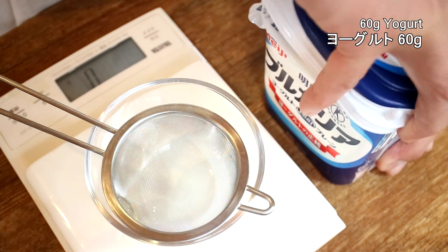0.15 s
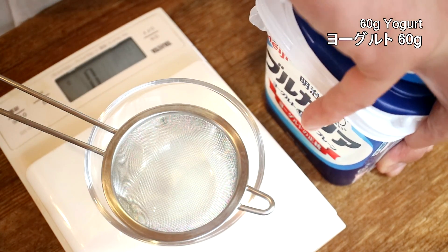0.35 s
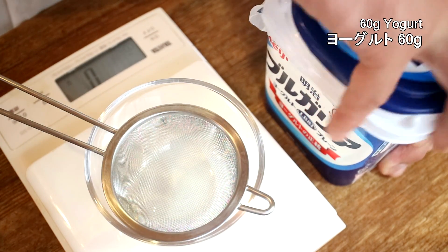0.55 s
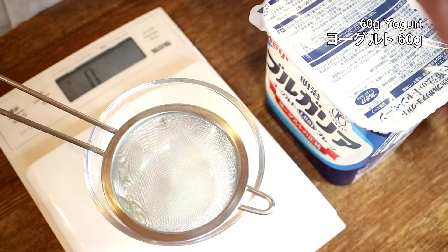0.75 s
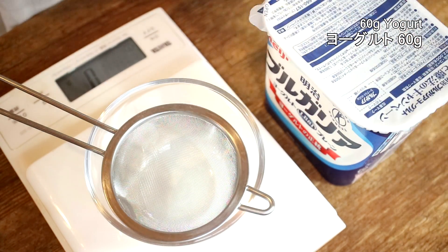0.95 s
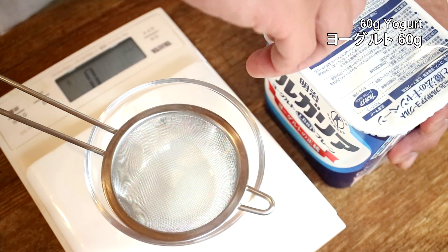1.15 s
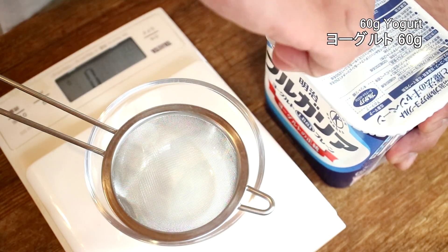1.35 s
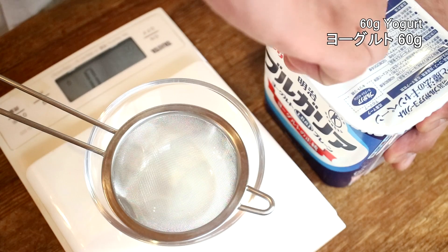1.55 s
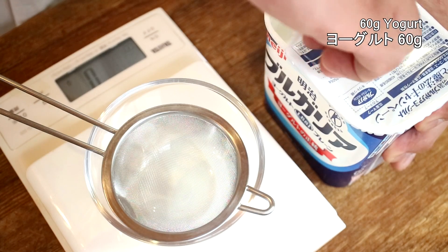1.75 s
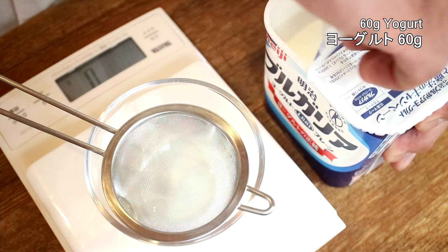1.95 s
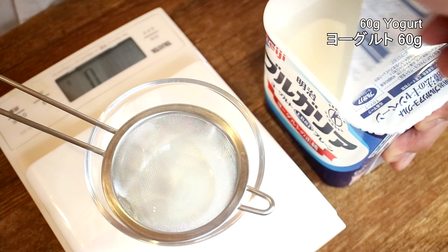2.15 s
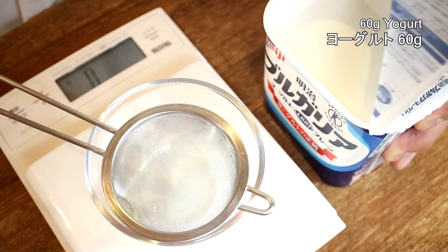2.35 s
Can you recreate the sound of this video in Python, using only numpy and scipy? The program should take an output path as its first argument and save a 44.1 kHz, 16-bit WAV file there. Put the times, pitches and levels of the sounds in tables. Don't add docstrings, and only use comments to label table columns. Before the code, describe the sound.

A plastic tub lid snaps off loudly, bounces faintly, then fingers tap and rub the tub before its foil seal is peeled with crackles, ticks and small squeaks; close stereo microphone in a small kitchen.

```python
import sys
import numpy as np
from scipy import signal
from scipy.fft import rfft, irfft, next_fast_len
from scipy.io import wavfile
from scipy.ndimage import uniform_filter1d

SR = 44100
rng = np.random.default_rng(int(sys.argv[2]) if len(sys.argv) > 2 else 0)


def voltage_ratio(decibels):
    exponent = np.asarray(decibels, float) / 20
    return 10 ** exponent


def to_wav(sig):
    pcm = np.clip(np.atleast_2d(sig), -1, 1) * 32767
    pcm = np.round(pcm).astype(np.int16)
    wavfile.write(sys.argv[1], SR, pcm.T)


N = 110250
T = np.arange(N) / SR
M = next_fast_len(N + SR)
HZ = np.maximum(np.arange(M // 2 + 1) * SR / M, 1.)

RING_CYCLES = 50
SLIPS_PER_S, SLIP_SCATTER_DB, SLIP_TOP_DB = 1500, 3.5, 9
CRACKLES_PER_S, CRACKLE_SCATTER_DB = 600, 3.8


def curve(table):
    table = np.array(table)
    return np.interp(np.log(HZ), np.log(table[:, 0]), table[:, 1])


def shape(x, gain):
    return irfft(rfft(x, M) * gain, M)[..., :N]


def rms(x):
    return np.sqrt(np.mean(x ** 2))


def level(x, db):
    return x * voltage_ratio(db) / rms(x)


def add(out, start_s, x):
    i = int(start_s * SR)
    out[i:i + len(x)] += x[:len(out) - i]


def swell(start_s, length_s, attack_s, release_s):
    rise = np.clip((T - start_s) / attack_s, 0, 1)
    return rise * np.exp(-np.maximum(T - start_s - length_s, 0) / release_s)


def wander(seconds):
    k = int(seconds * SR)
    smooth = uniform_filter1d(rng.standard_normal(N), k)
    return level(uniform_filter1d(smooth, k), 0)


def slips(rate, scatter_db, size=N):
    when, sign, strength = rng.random((size, 3)).T
    strength_db = np.minimum(-scatter_db * np.log(strength + 1e-9), SLIP_TOP_DB)
    return (when < rate / SR) * np.sign(sign - .5) * voltage_ratio(strength_db)


def ring(force, modes, extra_db=0):
    mode_hz = np.array(modes)[:, 0]
    new_cluster = mode_hz[1:] > 1.15 * mode_hz[:-1]
    sense = (-1.) ** np.cumsum(np.r_[0, new_cluster])
    extra_db = extra_db + np.zeros(len(modes))
    out = 0
    for (hz, db, t60), more_db, sign in zip(modes, extra_db, sense):
        t60 = np.clip(t60, .004, RING_CYCLES / hz)
        r = np.exp(-np.log(1000) / (t60 * SR))
        w = 2 * np.pi * hz / SR
        resonance = signal.lfilter([.5, 0, -.5], [1, -2 * r * np.cos(w), r * r], force) / np.sin(w)
        out = out + sign * voltage_ratio(db + more_db) * resonance
    return out


def blow(modes, peak_db, contact_ms, extra_db, scuff_db, scuff_s):
    t = T[:SR // 4]
    push = np.exp(-.5 * ((t[:88] - .001) * 4000 / contact_ms) ** 2)
    scuff = slips(SLIPS_PER_S, SLIP_SCATTER_DB, size=len(t)) * np.exp(-t / scuff_s)
    force = (t == 0) + voltage_ratio(scuff_db) * scuff
    y = ring(np.convolve(force, push)[:len(t)], modes, extra_db)
    return y * voltage_ratio(peak_db) / np.abs(y).max()


# pitch_hz [Hz], level_db [dB], t60_s [s]
LID_MODES = [(85, -42, .1), (158, -37, .13), (445, -9, .075), (523, -14, .06), (600, -10, .04),
             (671, -9, .08), (820, -1, .065), (886, -2, .06), (996, -1, .045), (1290, -13, .05),
             (1627, 3, .05), (1846, 1, .055), (2340, -9, .03), (3800, -9, .013)]
# start_s [s], peak_db [dB]
LID_POPS = [
    (0.2133, -4),
    (.2275, -14),
    (.2545, -37),
    (.271, -36.5),
    (.295, -40.5),
    (.308, -36.5),
]
# pitch_hz [Hz], level_db [dB per Hz]
FOIL_SPECTRUM = [(710, -28), (1200, -4), (1520, -7), (1800, -8), (2290, -12.5), (2710, -8), (3050, -9.5),
                 (7600, -20), (12000, -30), (16800, -53.5), (22000, -120)]


def lid():
    out = np.zeros(N)
    for start_s, peak_db in LID_POPS:
        add(out, start_s - .001, blow(LID_MODES, peak_db, contact_ms=.36, extra_db=0, scuff_db=-27, scuff_s=.025))
    burst = rng.standard_normal(N) * np.exp(-T / .01)
    crack = shape(burst, voltage_ratio(curve(FOIL_SPECTRUM)) * (HZ > 1200))
    add(out, LID_POPS[0][0], crack * voltage_ratio(-31) / np.abs(crack).max())
    return out


# pitch_hz [Hz], level_db [dB], t60_s [s]
TUB_MODES = [(221, -19, .05), (405, -14, .04), (458, -12, .05), (600, -12, .025), (690, -5, .025),
             (810, 0, .055), (942, -8, .04), (998, 0, .045), (1230, -11, .03), (1620, -14, .016),
             (2200, -12, .016), (2800, -7, .018), (3450, -7, .014), (4000, -10, .013)]
# start_s [s], peak_db [dB], scuff_s [s], low_modes_db [dB], high_modes_db [dB]
KNOCKS = [(.139, -50.5, 0.036, 0, 17.5), (0.19, -29, 0.006, 1, 8), (0.523, -50.5, 0.0052, -8.5, -2),
          (.575, -45.5, 0.0031, -10, 18), (0.591, -30.5, 0.01, -2.5, 19), (.606, -36.5, 0.003, 10.5, 21.5),
          (.613, -47, 0.008, 23, 3), (1.0995, -32, 0.01, 5, 3), (1.329, -33, 0.012, 1, -4),
          (1.503, -46.5, 0.0056, -16.5, -7), (1.571, -55.5, 0.0022, -32, 10),
          (1.634, -39.5, 0.0045, -22, 2), (1.734, -38, 0.0037, -17, -11), (1.823, -32.5, 0.0071, -9, -24),
          (1.862, -34, 0.024, -18, -6), (1.885, -33.5, 0.004, -17, -3), (2.222, -31, 0.0031, 5, 18),
          (2.235, -24.5, 0.0013, -23, 25)]
KNOCK_RIM_DB = [0, 3, 0, 4, 6, 3, 4, -3, -7, 4, -4, -3, 0, 7, 7, 7, 0, 3]


def knocks():
    out = np.zeros(N)
    hz = np.array(TUB_MODES)[:, 0]
    chance_db = 1.0 * rng.standard_normal((len(KNOCKS), len(TUB_MODES)))
    for knock, rim_db, scatter_db in zip(KNOCKS, KNOCK_RIM_DB, chance_db):
        start_s, peak_db, scuff_s, low_db, high_db = knock
        rim = np.abs(hz - 1000) < 100
        place_db = low_db * (hz < 600) + high_db * (hz > 1300) + rim_db * rim + scatter_db
        add(out, start_s - .001, blow(TUB_MODES, peak_db, .2, place_db, -7, scuff_s))
    return out


def crackle():
    snaps = slips(CRACKLES_PER_S, CRACKLE_SCATTER_DB)
    spectrum = 0
    for hz in 1200 * 2 ** (np.arange(11) / 3):
        grains = slips(CRACKLES_PER_S, CRACKLE_SCATTER_DB) + .35 * snaps
        patches = voltage_ratio(3.5 * wander(.025))
        band = np.exp(-(np.log2(HZ / hz) * 3) ** 2)
        spectrum = spectrum + rfft(grains * patches, M) * band
    return level(irfft(spectrum * voltage_ratio(curve(FOIL_SPECTRUM)), M)[:N], 0)


# pitch_hz [Hz], level_db [dB], t60_s [s]
TABLE_MODES = [(84.84, -1.5, 0.086), (131.53, -26, 0.07), (150.9, 8.5, 0.17), (285, -15, 0.12),
               (282.6, 14.5, 0.068)]
# start_s [s], length_s [s], tub_db [dB], foil_db [dB], table_db [dB]
STROKES = [(0, 0.094, -60, -71.5, -81), (0.171, 0.097, -48, -56, -77), (0.513, 0.02, -59, -65, -62.5),
           (0.587, 0.02, -77, -58, -61.5), (0.767, 0.024, -82, -71.5, -88), (0.93, 0.022, -78, -68, -78),
           (1.027, 0.084, -72, -67.5, -72), (1.104, 0.15, -59, -78.5, -79), (1.204, 0.061, -62, -69, -75),
           (1.315, 0.035, -48.5, -61.5, -69), (1.478, 0.18, -65.5, -60.5, -67.5),
           (1.562, 0.05, -50.5, -53.5, -56.5), (1.625, 0.0064, -43.5, -68, -50),
           (1.702, 0.17, -57.5, -62, -61.5), (1.801, 0.012, -51.5, -52.5, -82),
           (1.825, 0.049, -45.5, -48, -63), (1.87, 0.076, -47.5, -49, -52.5), (1.952, 0.11, -52, -53, -55),
           (2.073, 0.051, -48.5, -51.5, -52), (2.125, 0.096, -46, -50, -42),
           (2.214, 0.048, -46, -45, -41.5), (2.273, 0.099, -54.5, -53.5, -46),
           (2.374, 0.045, -58.5, -52, -44), (2.411, 0.085, -51.5, -53.5, -43)]


def stroke_envelope(column, attack_s):
    power = 0
    for stroke in STROKES:
        power = power + (swell(stroke[0], stroke[1], attack_s, .02) * voltage_ratio(stroke[column])) ** 2
    return np.sqrt(power)


def dragged(modes, column):
    force = slips(SLIPS_PER_S, SLIP_SCATTER_DB)
    return ring(force * stroke_envelope(column, attack_s=.01), modes) / rms(ring(force, modes))


def strokes():
    tub = dragged(TUB_MODES, column=2)
    table = dragged(TABLE_MODES, column=4)
    return tub + table + crackle() * stroke_envelope(column=3, attack_s=.025)


# start_s [s], peak_db [dB]
TICKS = [(1.488, -47), (1.5344, -50), (1.5714, -39.5), (1.5993, -45), (1.8654, -36), (1.8784, -43),
         (1.9034, -30.5), (1.9254, -36), (1.9514, -33), (1.9824, -48), (2.0014, -47.5), (2.0474, -39),
         (2.0594, -54), (2.1086, -46), (2.1395, -34.5), (2.1654, -43.5), (2.2209, -40.5), (2.2338, -31),
         (2.2424, -73), (2.3044, -42), (2.4788, -40.5)]
# start_s [s], length_s [s], pitch_hz [Hz]
STRIPS = [(1.818, .03, 4350), (1.84, .06, 3750), (1.895, .06, 3420), (1.878, .03, 5900), (1.84, .04, 6700),
          (1.985, .07, 3350), (2.03, .04, 7050), (2.285, .05, 7600), (2.345, .1, 7200), (2.26, .04, 3500),
          (1.598, .02, 6300), (1.825, .07, 1000)]
STRIP_DB = [-51, -52, -55, -57, -60, -58, -61, -62, -64, -59, -56, -45]


def tearing():
    out = np.zeros(N)
    t = T[:200]
    tick_band = signal.butter(3, [2600, 7500], "band", fs=SR)
    for (start_s, peak_db), noise in zip(TICKS, rng.standard_normal((len(TICKS), len(t)))):
        snap = ((t == 0) + .15 * noise) * np.exp(-t / .0002)
        tick = signal.lfilter(*tick_band, snap)
        add(out, start_s, tick * voltage_ratio(peak_db) / np.abs(tick).max())
    t = T[:800]
    for (start_s, length_s, hz), db in zip(STRIPS, STRIP_DB):
        grain = np.exp(-t * hz / 5) * np.sin(2 * np.pi * hz * t)
        rings = signal.fftconvolve(slips(CRACKLES_PER_S, CRACKLE_SCATTER_DB), grain)[:N]
        out += level(rings, db) * swell(start_s, length_s, .008, .008)
    return out


# start_s [s], peak_db [dB], pitch_hz [Hz]
CLICKS = [(0.349, -50.5, 3820), (0.418, -64.5, 3190), (1.536, -62, 3500), (1.5868, -42, 3580),
          (1.595, -53, 3960), (1.5999, -33, 4700), (1.6091, -32.5, 6030), (1.9542, -45.5, 3470),
          (2.0031, -37, 3760), (2.109, -40.5, 3760), (2.1415, -39.5, 5000), (2.2219, -30.5, 4700),
          (2.2345, -40, 4900), (2.3913, -33.5, 3530)]
# start_s [s], length_s [s], pitch_hz [Hz], level_db [dB]
SQUEAKS = [(1.938, 0.0164, 2715, -48.5), (2.012, 0.016, 2750, -49.5), (2.14, 0.0145, 2790, -44.5),
           (2.167, 0.0041, 2800, -42), (2.171, 0.0044, 2900, -58), (2.21, 0.0071, 2710, -44),
           (2.23, 0.018, 2636, -40.5), (2.399, 0.0041, 3550, -56)]


def foil():
    out = np.zeros(N)
    t = T[:800]
    for (start_s, peak_db, hz), noise in zip(CLICKS, rng.standard_normal((len(CLICKS), len(t)))):
        decay = np.exp(-t * hz / 3.5)
        add(out, start_s, voltage_ratio(peak_db) * decay * (np.sin(2 * np.pi * hz * t) + .06 * noise))
    for start_s, length_s, hz, db in SQUEAKS:
        out += voltage_ratio(db - .5) * swell(start_s, length_s, .00071, .0018) * np.sin(2 * np.pi * hz * T)
    return out


# pitch_hz [Hz], ratio [1]
DIFFUSE_WIDTH = [(60, .1), (250, .2), (600, .7), (1300, 1.3), (6000, 1.1), (12000, 1.6)]


def diffuse(mid, side):
    return mid + shape(side, curve(DIFFUSE_WIDTH)) * np.array([[1], [-1]])


def room(x):
    low = 1 / (1 + (HZ / 2500) ** 2)
    noise = rng.standard_normal((2, N)) * np.clip(T / .004, 0, 1) ** 2
    bass_tail = shape(noise * voltage_ratio(-60 * T / .27), low)
    treble_tail = shape(noise * voltage_ratio(-60 * T / .22), 1 - low)
    tail = bass_tail + treble_tail
    tail = tail / np.sqrt(np.sum(tail[0] ** 2))
    return voltage_ratio(-10.5) * shape(x, rfft(diffuse(*tail), M))


# pitch_hz [Hz], level_db [dB per Hz]
KITCHEN_SPECTRUM = [(25, -12), (45, -10), (100, -5.5), (170, -12), (300, -16), (1000, -24), (5000, -35),
                    (12500, -49), (14500, -72)]
# pitch_hz [Hz], level_db [dB]
FRIDGE_HUM = [(43, -70), (59, -76), (237.5, -76.5), (441, -79), (523, -83.5), (711, -116), (944, -91)]


def kitchen():
    mid, side = shape(rng.standard_normal((2, N)), voltage_ratio(curve(KITCHEN_SPECTRUM)))
    hum = 0
    for hz, db in FRIDGE_HUM:
        wobble_db = 1.2 * wander(.069)
        hum = hum + voltage_ratio(db + 6 + wobble_db) * np.sin(2 * np.pi * (hz * T + rng.random()))
    return level(diffuse(mid, side), -64.5) + hum


# pitch_hz [Hz], level_db [dB]
PORT_DB = [(200, 0), (360, 2.5), (640, 8), (1160, 9), (2100, -1), (12500, 0)]
# pitch_hz [Hz], lead_rad [rad]
PORT_RAD = [(350, 0), (600, .5), (1120, 1.3), (2000, 1), (3100, -1), (7000, 1.1), (12000, 1.9)]


def scene():
    near = lid() + knocks() + strokes() + foil() + tearing()
    near = signal.sosfilt(signal.butter(1, 130, "high", fs=SR, output="sos"), near)
    half = voltage_ratio(curve(PORT_DB) / 2) * np.exp(.5j * curve(PORT_RAD))
    ports = np.array([half, 1 / half]) * 2 / np.abs(half + 1 / half)
    return shape(near + room(near), ports) + shape(kitchen(), np.sqrt(np.abs(ports)))


def top_cut(x):
    return signal.sosfilt(signal.butter(12, 15500, fs=SR, output="sos"), x)


def record(dry):
    mix = signal.sosfilt(signal.butter(3, [30, 13100], "band", fs=SR, output="sos"), dry)
    return top_cut(mix)


dry = scene()
out = record(dry)
to_wav(out)
```